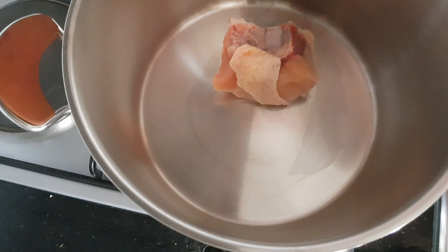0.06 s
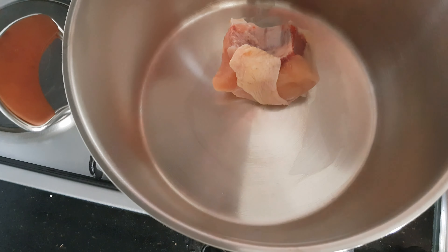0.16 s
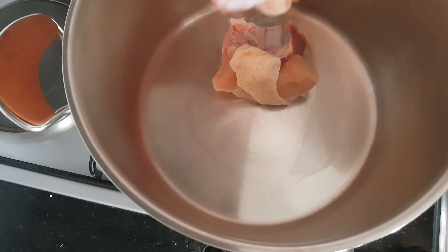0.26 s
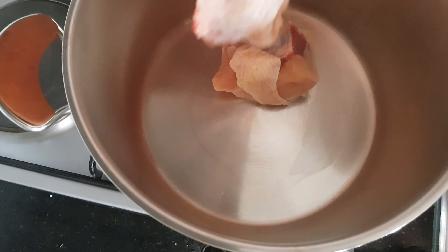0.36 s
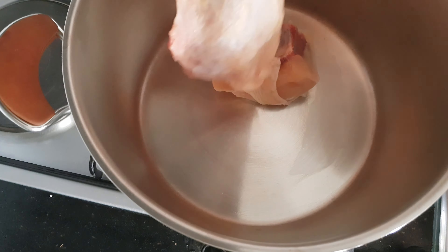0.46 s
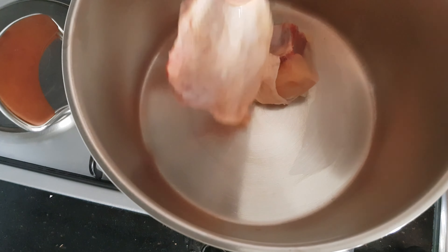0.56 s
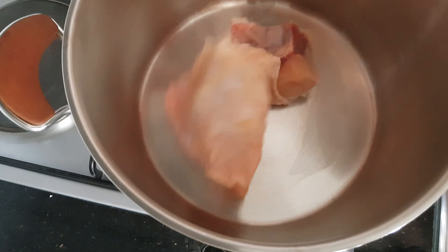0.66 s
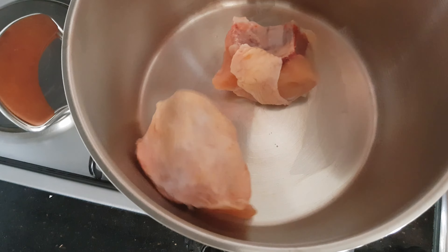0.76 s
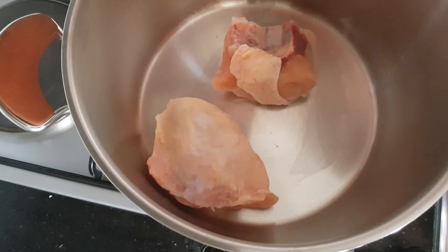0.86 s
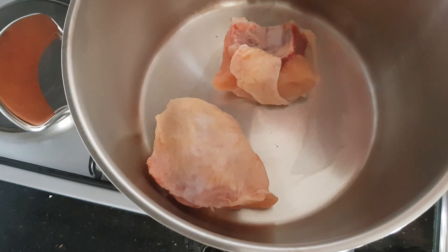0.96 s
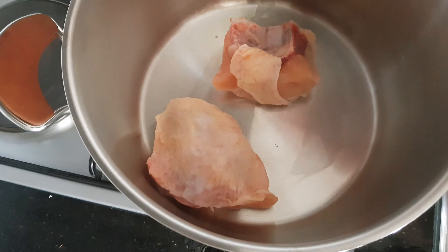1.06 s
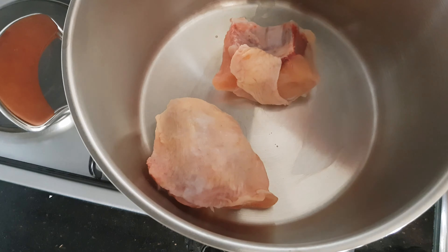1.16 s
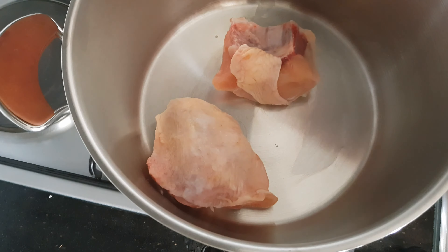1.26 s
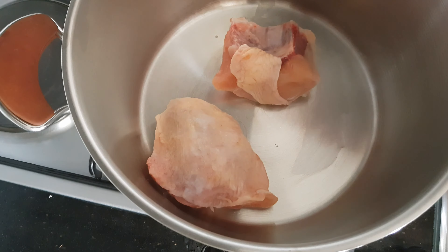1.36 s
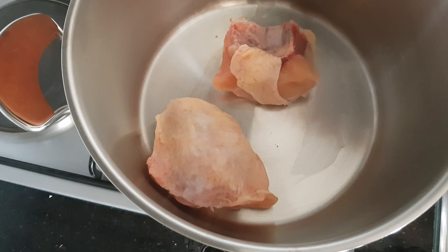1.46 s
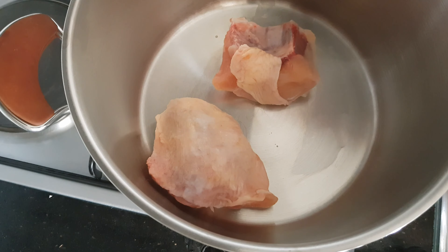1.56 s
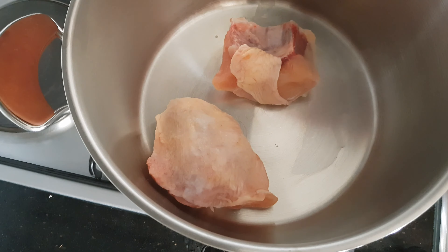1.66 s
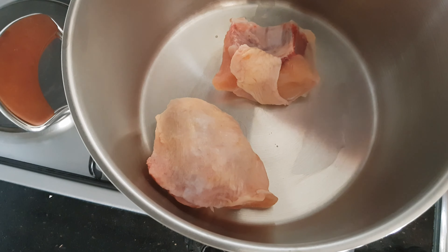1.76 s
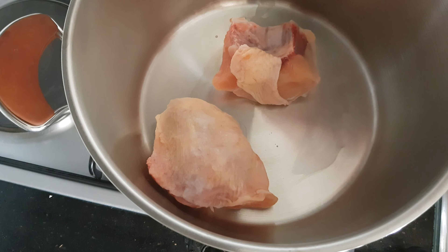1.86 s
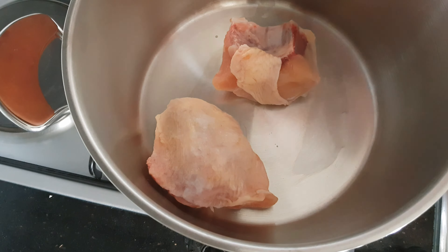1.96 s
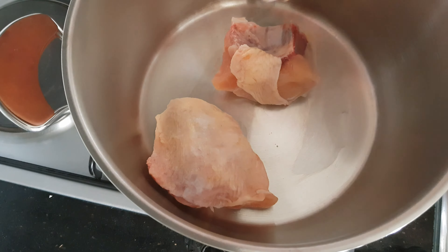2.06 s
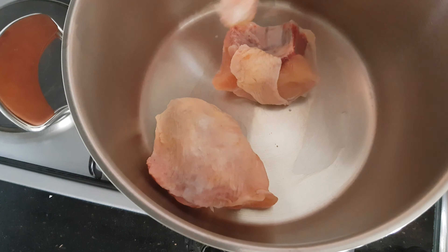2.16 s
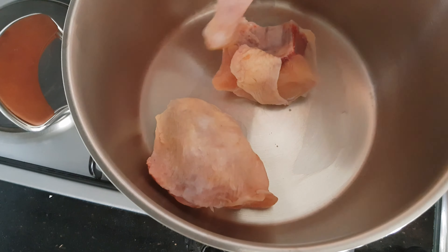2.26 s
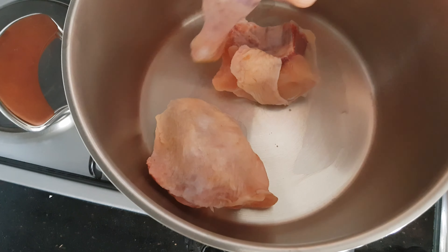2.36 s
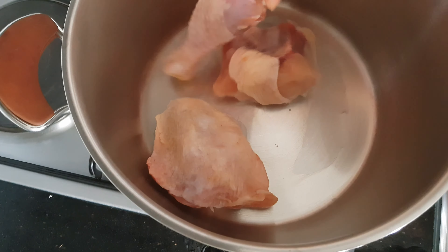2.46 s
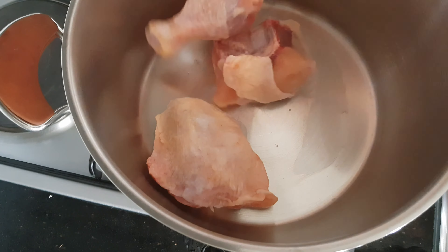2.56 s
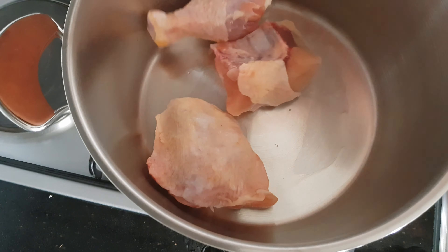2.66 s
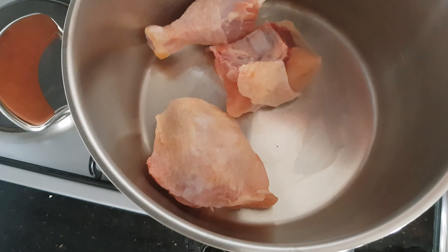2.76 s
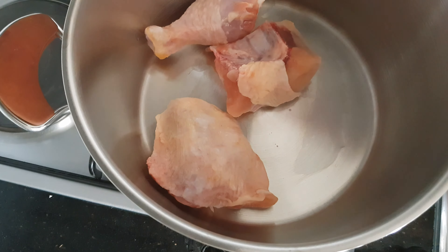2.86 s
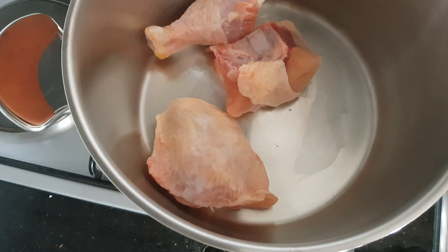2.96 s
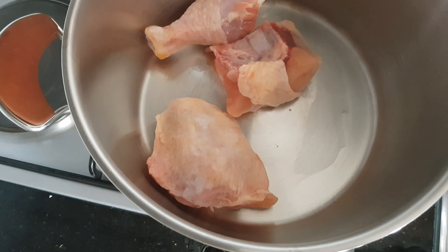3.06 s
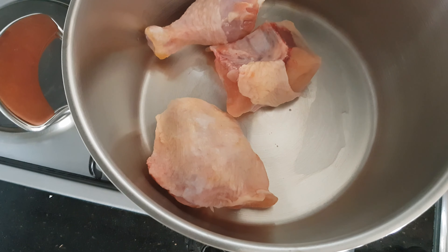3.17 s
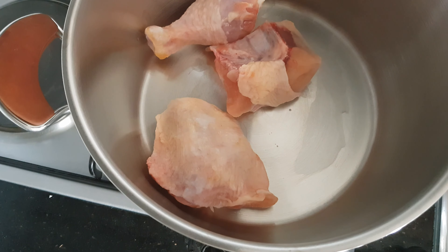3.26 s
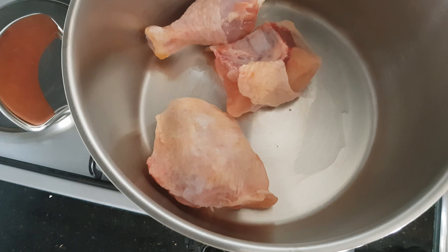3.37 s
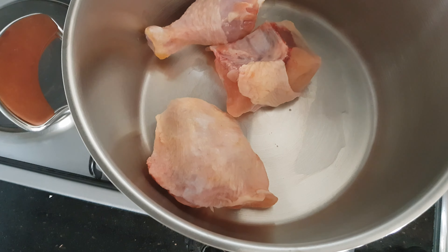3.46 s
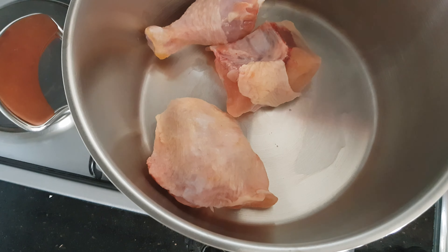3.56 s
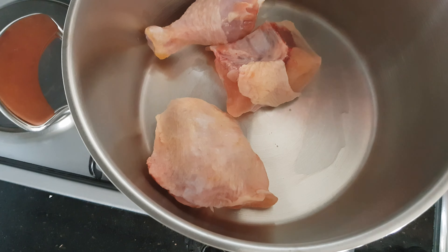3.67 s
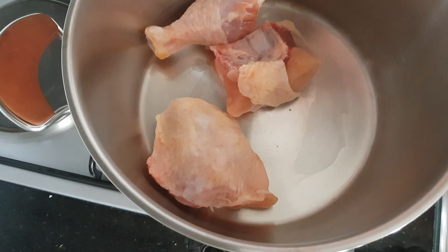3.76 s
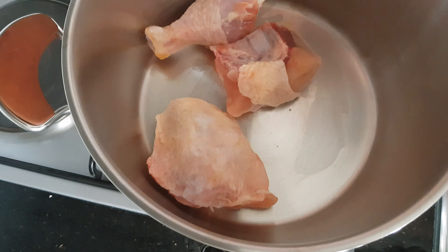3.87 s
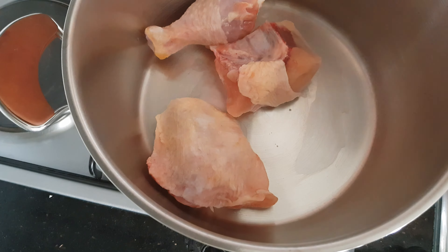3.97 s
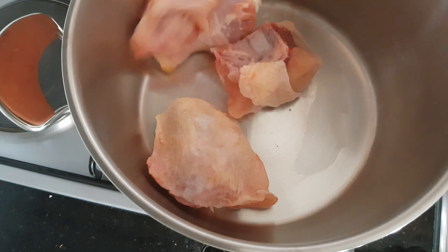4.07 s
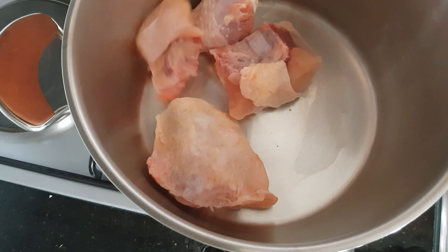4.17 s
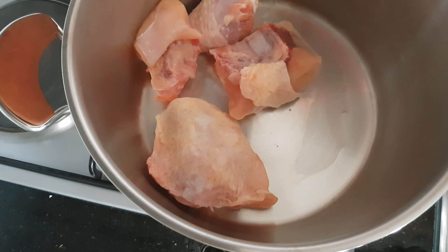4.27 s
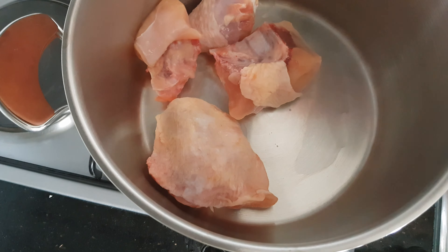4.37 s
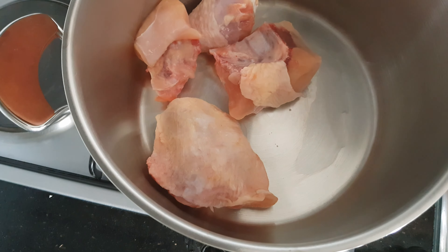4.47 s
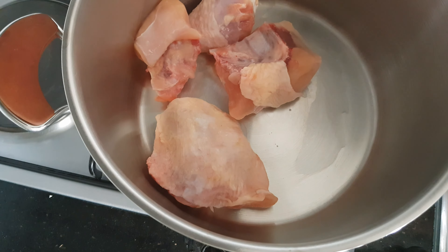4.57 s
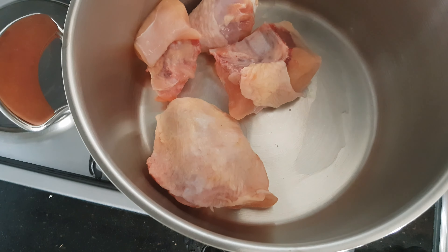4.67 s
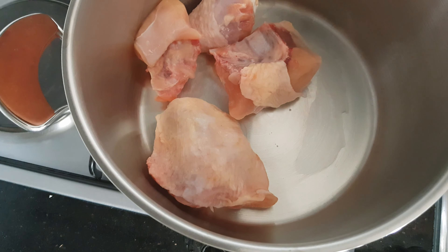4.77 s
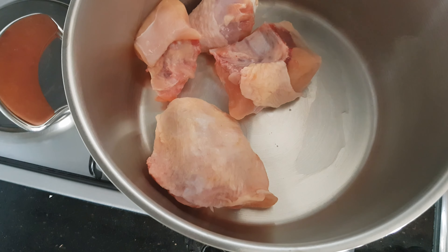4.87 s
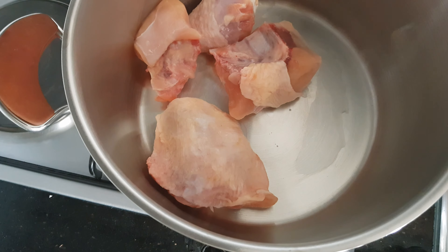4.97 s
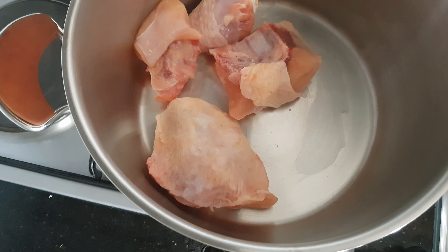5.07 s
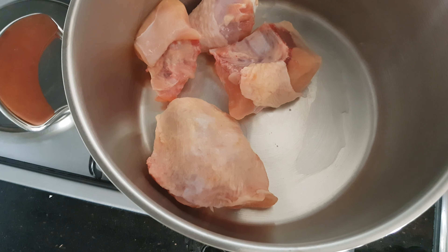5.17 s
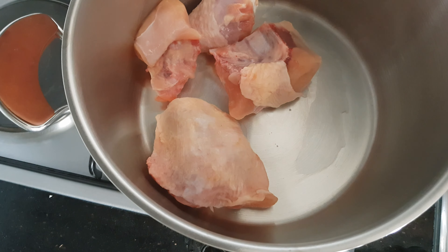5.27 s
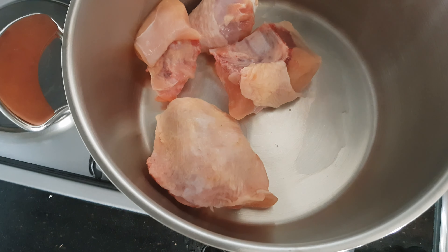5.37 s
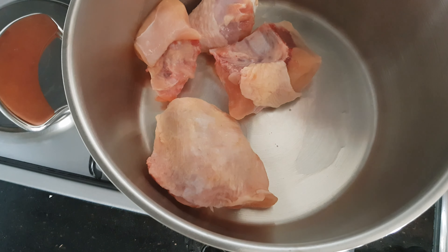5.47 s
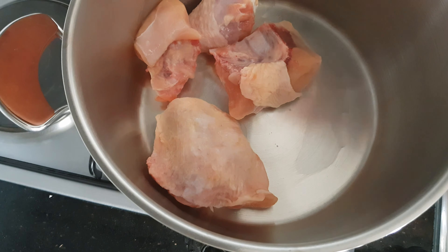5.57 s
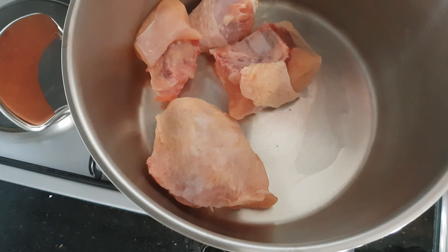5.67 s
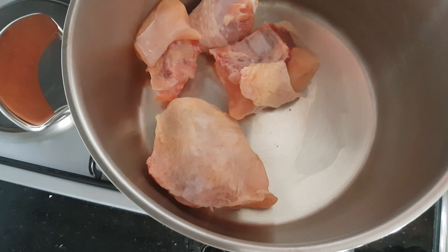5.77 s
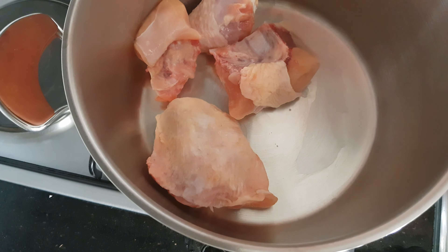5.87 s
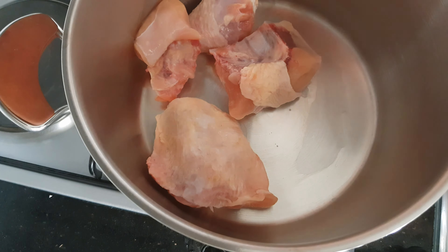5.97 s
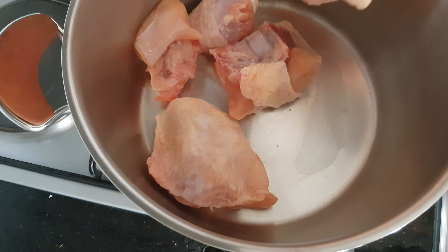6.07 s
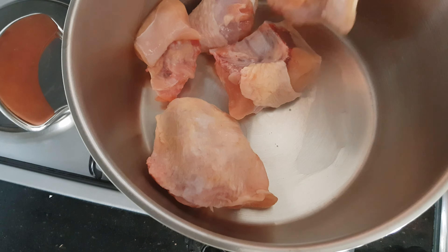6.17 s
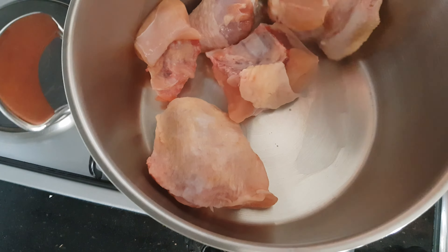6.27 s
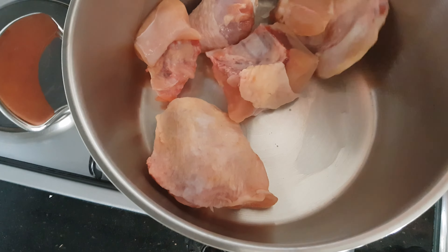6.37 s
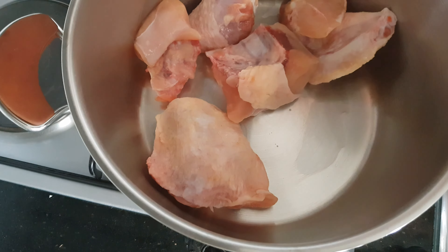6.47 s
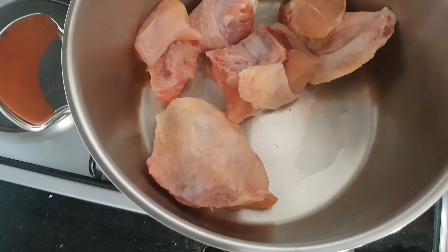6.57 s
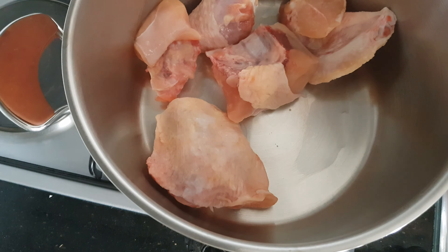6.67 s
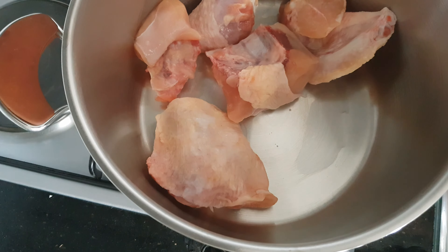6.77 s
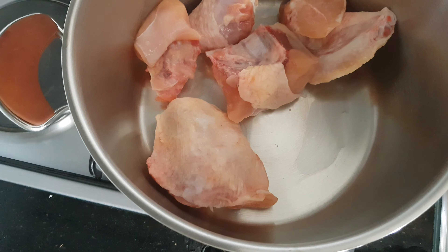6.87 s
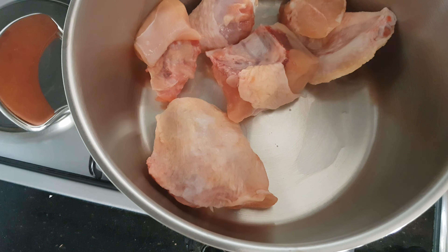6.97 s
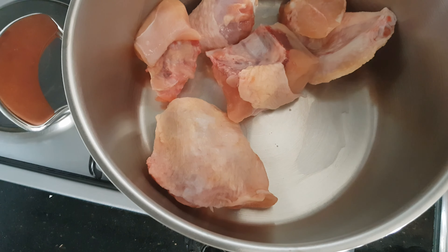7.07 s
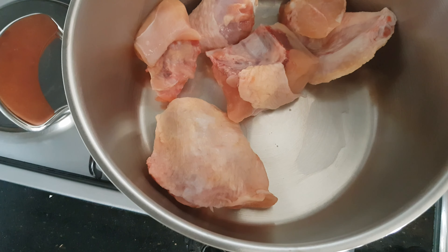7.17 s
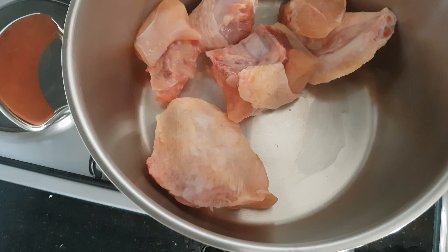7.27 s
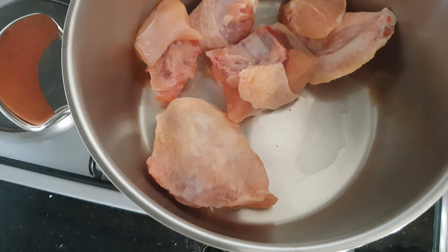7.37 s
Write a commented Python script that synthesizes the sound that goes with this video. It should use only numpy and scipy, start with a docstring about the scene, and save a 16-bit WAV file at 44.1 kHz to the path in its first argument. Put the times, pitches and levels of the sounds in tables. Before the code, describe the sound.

Raw chicken pieces land in a steel pot one at a time, each moist thud followed by the pot briefly clattering on the stove.

```python
"""Soft thuds and wet squelches: four pieces of raw chicken drop one by one into an empty steel pot.
The flesh wobbles and shakes the stove top; film and air are squeezed from between skin and steel.
After each drop the pot rocks and knocks on the grate, its modes ringing briefly.
Between drops wet skin crackles and ticks faintly over the low hum of a small kitchen."""
import sys
import numpy as np
from scipy import signal
from scipy.fft import rfft, irfft, next_fast_len
from scipy.io import wavfile

SR = 44100
rng = np.random.default_rng(int(sys.argv[2]) if len(sys.argv) > 2 else 0)


def wav_record(signal):
    """Record a signal, one row per channel, as 16-bit PCM in the file named by sys.argv[1]."""
    frames = np.transpose(np.atleast_2d(signal))
    bounded = np.clip(frames, -1, 1)
    # unit amplitude maps onto the largest positive 16-bit level
    quanta = np.round(bounded * 32767).astype(np.int16)
    wavfile.write(sys.argv[1], SR, quanta)


N = 327655
TIME = np.arange(N) / SR

# Meat touches down, some pieces again as they topple. Each row: start in s, push in dB, push pitch in Hz,
# slap in dB, time to flatten in s, squelch in dB, gurgle in dB, decay of both in s, flop in dB.
TOUCHDOWNS = [(0.614, -46.5, 85, -59.5, .025, -77, -61, 0.019, -48.5),
              (0.667, -35.5, 213, -59.5, .034, -49, -42.5, 0.024, -43.5),
              (0.764, -50, 88.5, -47, .02, -53.5, -58, 0.02, -46.5),
              (0.780, -39.5, 200, -36, .024, -44.5, -44.5, .02, -45),
              (2.445, -32, 262, -49, .028, -60, -55.5, 0.075, -50),
              (2.568, -50, 273, -52, .04, -57, -53, 0.06, -45),
              (4.037, -54, 107, -58, .05, -44.5, -50.5, 0.035, -52),
              (6.247, -36.5, 214, -50, 0.032, -45, -40.5, 0.015, -37.5)]


def thuds(flop_hz=100):
    """Each landing: a first push, then a flop as the piece flattens and its full weight arrives."""
    out = np.zeros((2, N))
    for s, push_db, push_hz, _, flatten_s, _, _, _, flop_db in TOUCHDOWNS:
        push = thud(push_hz, shake_db=-5, flesh_db=-6, wobble_s=.013)
        flop = thud(flop_hz, shake_db=1, flesh_db=-4.5, wobble_s=.042)
        add(out, s, gain_of(push_db) * push)
        add(out, s + flatten_s, gain_of(flop_db) * flop)
    return panned(2.5) * out


def thud(push_hz, shake_db, flesh_db, wobble_s, rise_s=.007):
    """A push of about one cycle shakes the stove top; wobbling flesh drums on the pot's base."""
    # Each row: frequency in Hz, level in dB, t60 in s.
    stove_modes = [(62, 10, 0.068), (87.6, -14, 1), (123.7, -9.5, 0.63), (161, -5.5, 0.44), (280, -39, 0.7),
                   (340, -47, 0.48), (513, 7, 0.12)]
    t = np.arange(SR // 2) / SR
    stove = sum(gain_of(db - 60 * t / t60) * np.sin(2 * np.pi * hz * t) for hz, db, t60 in stove_modes)
    cycles = t * push_hz
    push = -np.sin(2 * np.pi * cycles) * (np.e * cycles / .8) ** 2 * np.exp(-2 * cycles / .8)
    shake = 2 * signal.fftconvolve(push, stove)[:len(t)] / abs(push).sum()
    flesh = noise(len(t), band(hz=292, octaves=.86)) * np.exp(-t / wobble_s) * (1 - np.exp(-t / rise_s))
    return push + gain_of(shake_db) * shake + gain_of(flesh_db) * flesh


def squelches(slap_decay_s=.0088):
    """Skin slaps steel, trapped air gurgles, and the squelch sinks in pitch as the film is squeezed out."""
    # Each row: centre in Hz, width in octaves, level in dB, peak time as a share of the time to flatten.
    film_bands = [(13300, .35, -7, .45), (5480, 0.4, -0.5, .9)]
    out, t = np.zeros((2, N)), np.arange(SR // 3) / SR
    for s, _, _, slap_db, flatten_s, squelch_db, gurgle_db, decay_s, _ in TOUCHDOWNS:
        slap = np.exp(-t / slap_decay_s) * crackle(len(t), hz=10000, octaves=2)
        gurgle = swell(t, .7 * flatten_s, decay_s) * crackle(len(t), hz=1000, octaves=.8)
        add(out, s, gain_of(slap_db) * slap + gain_of(gurgle_db) * gurgle)
        for hz, octaves, db, share in film_bands:
            film = swell(t, share * flatten_s, decay_s) * crackle(len(t), hz, octaves)
            add(out, s, gain_of(squelch_db + db) * film)
    return out


def knocks(scatter_db=2.4, right_lag_s=.00008, scatter_rad=.7, burst_s=.0084, wash_s=.013):
    """The pot rocks on the grate; each knock rings its modes and rattles round inside it."""
    # Each row: start in s, level in dB, contact cut-off in Hz, wall-mode gain in dB.
    hits = [(0.656, -36.5, 3030, -4), (0.7452, -42.5, 2880, -3), (0.773, -27.5, 4300, -7),
            (0.8098, -33, 3760, 10.5), (0.8421, -39, 3420, -8), (2.463, -35.5, 1920, -5),
            (2.6001, -23.5, 3400, -7), (2.6730, -22, 4030, 0), (2.713, -33.5, 2200, -7),
            (4.0744, -30, 2900, -7), (4.109, -27, 2880, -7.5), (4.1701, -33.5, 2150, 0),
            (4.2070, -41, 2200, -1), (6.2732, -31, 2400, -5), (6.3141, -24.5, 7800, 13),
            (6.4134, -28, 4600, 6.5), (6.4904, -30.5, 4450, 6), (6.538, -48, 2010, 12),
            (6.5843, -43, 1900, 1.5)]
    # Modes of the meat-damped pot. Each row: frequency in Hz, level in dB, t60 in s, wall share 0-1.
    pot_modes = [(482, -25, 0.13, 0), (869, -25.5, 0.13, 0.5), (968, -17.5, 0.085, 0.2),
                 (1144, -13, 0.032, 0.1), (1246.6, -14, 0.069, 0.4), (1466, -9.5, 0.016, 0.4),
                 (1543, -18, 0.057, 0.95), (1744, -10, 0.036, 0.5), (1892, 0.5, 0.013, 0.4),
                 (1970, -5, 0.0493, 0), (2225, -22.5, 0.2, 0.3), (2300, -2, 0.0084, 0.8),
                 (2550, -15.5, 0.054, 0.4), (2650, -14, 0.015, 0.89), (2905, -18, 0.035, 0.82),
                 (3260, -10.5, 0.028, 0.09), (3527, -13.5, .015, 0.4), (3660, -50.5, .9, .3),
                 (3800, -55, .8, 0.1), (4220, -21.5, 0.039, 0.16), (4620, -17, 0.063, 0.27),
                 (5000, -22.5, 0.065, .2), (5290, -24.5, 0.08, 0.55), (5800, -37, 0.044, 0.33),
                 (6430, -24.5, 0.065, 0.24), (6800, -26.5, 0.065, 0)]
    # Crowd of small modes and echoes in the pot. Each row: frequency in Hz, relative density in dB.
    clatter_spectrum = [(200, -32), (480, -13), (700, -22.5), (1000, -14.5), (1550, -24), (2050, 5.5),
                        (2700, -24), (3400, -3), (4100, -15.5), (5100, -7.5), (6500, -9.5), (9000, -9.5),
                        (12500, -3.5), (15500, -22)]
    # Each new piece shifts the load and the modes it favours.
    # Each row: start in s, low-mode gain in dB, upper base-mode gain in dB, left over right in dB.
    loads = [(0, 6, 9.5, 2), (2, -0.5, -1.5, 3), (4, 2.5, 6, 4.5), (6, 3, 3, 1)]
    out, t = np.zeros((2, N)), np.arange(SR // 3) / SR
    hz, db, t60, wall = np.transpose(pot_modes)
    # Neighbouring modes swing in opposite senses and arrive later on the right.
    phase = np.pi * np.arange(len(hz)) - 2 * np.pi * hz * np.array([[0], [right_lag_s]])
    decay = gain_of(-60 * t / t60[:, None])
    low, upper = 1 / (1 + (hz / 1500) ** 6), band(hz=3380, octaves=.12)(hz)
    clatter_envelope = gain_of(-6) * np.exp(-(t / burst_s) ** 2) + gain_of(-17) * np.exp(-t / wash_s)
    for s, level_db, contact_hz, wall_db in hits:
        _, low_db, upper_db, pan_db = [load for load in loads if load[0] <= s][-1]
        # The meat shifts between knocks: pitches and levels scatter.
        pitch_hz = hz * (1 + .005 * rng.standard_normal(len(hz)))
        mode_db = db + low_db * low + upper_db * upper + wall_db * wall
        mode_db += scatter_db * rng.standard_normal(len(hz))
        jitter = scatter_rad * rng.standard_normal((2, len(hz))) * [[.4], [1]]
        weights = gain_of(mode_db) * np.exp(1j * (phase + jitter))
        ring = (weights @ (decay * np.exp(2j * np.pi * pitch_hz[:, None] * t))).imag
        clatter = clatter_envelope * noise((2, len(t)), lambda f: gain_of(lookup(clatter_spectrum, f)))
        blow = (ring + clatter) * (1 - np.exp(-t * contact_hz / 2))  # softer contact, slower rise
        add(out, s, gain_of(level_db) * panned(pan_db) * contact(blow, contact_hz))
    return out


def contact(x, hz, q=1.1):
    """Springy contact: a resonant low-pass at hz, with a further roll-off above it."""
    x = signal.lfilter(*signal.butter(1, min(3.4 * hz, SR * .45), fs=SR), x)
    w = np.tan(np.pi * min(hz, SR * .45) / SR)
    denominator = [1 + w / q + w * w, 2 * (w * w - 1), 1 - w / q + w * w]
    return signal.lfilter(w * w * np.array([1, 2, 1]), denominator, x)


def ticks(snap_s=.0006, echo_s=.013):
    """Sticky skin snaps free: short ticks, pitched over a broad body, that echo in the pot."""
    # Each row: start in s, level in dB, pitch in Hz.
    snaps = [(0.719, -37, 12800), (1.7033, -60, 7230), (3.1442, -52, 14100), (3.187, -57, 7060),
             (3.236, -40.5, 13500), (4.623, -51.5, 14000), (4.8292, -57, 11700)]
    out, t = np.zeros((2, N)), np.arange(4096) / SR
    body = band(hz=5400, octaves=1.7)
    envelope = np.exp(-t / snap_s) + gain_of(-21) * np.exp(-t / echo_s)
    for s, db, hz in snaps:
        snap = noise((2, len(t)), lambda f: band(hz, octaves=.067)(f) + gain_of(-17) * body(f))
        add(out, s, gain_of(db) * snap * envelope)
    return out


def handling(pops_db=-10, rest_db=-88):
    """Wet skin crackles and tiny bubbles pop as the next piece is picked up."""
    # Each row: start in s, rise in s, decay in s, level in dB.
    pickups = [(.5, 0.051, 0.055, -76), (1.15, 0.2, 0.24, -77), (2.2, 0.056, .08, -79.5),
               (3, 0.035, .2, -76.5), (4.6, 0.21, 0.31, -78), (7.165, 0.0058, 0.031, -68)]
    grains = crackle(N, hz=6800, octaves=3.3, per_s=1500, spread_db=1)
    pops = crackle(N, hz=13200, octaves=.35, per_s=84, spread_db=2.5)
    return (grains + gain_of(pops_db) * pops) * (swells(pickups) + gain_of(rest_db))


def swishes():
    """Soft, dull brushing between the drops."""
    # Each row: start in s, rise in s, decay in s, level in dB.
    strokes = [(1.722, 0.032, .11, -63), (2.222, 0.066, 0.12, -65.5), (5.17, 0.16, .25, -69.5)]
    return swells(strokes) * noise((2, N), band(hz=890, octaves=.73))


def echoes(x, fade_s=.03):
    """Early reflections from the hood and the tiles behind the stove."""
    # Each row: four path delays in s; left row, then right.
    paths = [
        [.0085, .0115, .0165, .0225],
        [.0078, .0125, .018, .0245],
    ]
    out = np.zeros((2, N))
    for channel, delays_s in enumerate(paths):
        for s in delays_s:
            add(out[channel:channel + 1], s, np.exp(-s / fade_s) * x[channel])
    return out


def reverb(x, onset_s=.0062, mono_hz=260):
    """The kitchen's diffuse tail: mono in the bass, each band dying at its own rate."""
    # Each row: frequency in Hz, t60 in s.
    decay_times = [(150, 0.95), (700, 0.49), (2000, 0.42), (3200, 0.36), (3800, 0.54), (5200, 0.29),
                   (7000, 0.5), (14000, 0.25)]
    diffuse = stereo_noise(SR * 3 // 4, lambda f: 1 / (1 + (f / mono_hz) ** 4))
    hz, t, bands = signal.stft(diffuse, SR, nperseg=256)
    envelope = gain_of(-60 * t / lookup(decay_times, hz)[:, None]) * (1 - np.exp(-(t / onset_s) ** 2))
    tail = signal.istft(bands * envelope, SR, nperseg=256)[1]
    return signal.fftconvolve(x, tail / np.linalg.norm(tail[0]), axes=1)[:, :N]


def background(rumble_peak_s=4.72, rumble_width_s=.36):
    """Steady kitchen air, a wavering hum and a deep rumble that swells once."""
    # Each row: frequency in Hz, relative density in dB.
    air_spectrum = [(25, -30.5), (42, -4), (100, -5), (165, -7.5), (215, -18), (290, -9.5), (450, -18),
                    (750, -20), (1100, -20.5), (1600, -29.5), (2500, -43.5), (3300, -45.5), (6000, -44.5),
                    (8600, -56.5), (12500, -43.5), (16000, -47.5)]
    # Each row: frequency in Hz, left-right correlation.
    air_correlation = [(60, 1), (150, 0.82), (380, 0.73), (950, -0.15), (2400, -0.064), (6000, -0.17),
                       (15000, -0.23)]
    # Each row: frequency in Hz, level in dB.
    hum_tones = [(276, -68), (621, -76)]
    # Each row: frequency in Hz, left over right in dB.
    balance = [(60, 2.5), (380, -0.5), (2380, -2), (15000, 0)]
    air = stereo_noise(N, lambda f: lookup(air_correlation, f))
    air = gain_of(-58) * unit_rms(filtered(air, lambda f: gain_of(lookup(air_spectrum, f))))
    hum = sum(gain_of(db) * noise(N, band(hz, octaves=.044)) for hz, db in hum_tones)
    surge = np.exp(-.5 * ((TIME - rumble_peak_s) / rumble_width_s) ** 2)
    rumble = noise(N, band(hz=45.7, octaves=.1)) * (gain_of(-66) + gain_of(-55.5) * surge)
    return filtered(air + hum + rumble, lambda f: gain_of(np.outer([.5, -.5], lookup(balance, f))))


def crackle(size, hz, octaves, per_s=4000, spread_db=3.5):
    """Tiny wet snaps of uneven size in one band; stereo, rms 1."""
    sizes = gain_of(spread_db * np.minimum(rng.exponential(1, (2, size)), 4))
    snaps = sizes * rng.standard_normal((2, size)) * (rng.random((2, size)) < per_s / SR)
    return unit_rms(filtered(snaps, band(hz, octaves)))


def noise(shape, gain):
    """Noise shaped by gain(Hz); rms 1."""
    return unit_rms(filtered(rng.standard_normal(shape), gain))


def stereo_noise(size, correlation):
    """White noise whose channels are alike by correlation(Hz)."""
    left, other = rng.standard_normal((2, size))
    right = filtered(left, correlation) + filtered(other, lambda f: np.sqrt(1 - correlation(f) ** 2))
    return np.array([left, right])


def swell(t, rise_s, decay_s):
    """A gathering rise, then exponential decay."""
    return np.clip(t / rise_s, 0, 1) ** 1.5 * np.exp(-np.maximum(t - rise_s, 0) / decay_s)


def swells(rows):
    """Sum of timed swells as one envelope."""
    return sum(gain_of(db) * swell(TIME - s, rise_s, decay_s) for s, rise_s, decay_s, db in rows)


def filtered(x, gain):
    """Zero-phase filter by gain(Hz)."""
    size = next_fast_len(x.shape[-1], True)
    return irfft(rfft(x, size) * gain(np.fft.rfftfreq(size, 1 / SR)), size)[..., :x.shape[-1]]


def band(hz, octaves):
    """Bell-shaped gain over log frequency."""
    return lambda f: np.exp(-.5 * (np.log2((f + 1) / hz) / octaves) ** 2)


def lookup(points, hz):
    """Interpolates a table over log frequency."""
    f, value = np.transpose(points)
    return np.interp(np.log(hz + 1), np.log(f + 1), value)


def gain_of(db):
    """Decibels to amplitude."""
    return 10 ** (np.asarray(db) / 20)


def unit_rms(x):
    """Scales to rms 1."""
    return x / np.sqrt(np.mean(x ** 2) + 1e-20)


def panned(db):
    """Channel gains for left over right in dB."""
    return gain_of(np.array([[db], [-db]]) / 2)


def add(mix, s, sound):
    """Mixes a sound in at s seconds."""
    part = mix[:, round(s * SR):][:, :sound.shape[-1]]
    part += sound[..., :part.shape[1]]


def scene():
    """Pot and meat close by, the kitchen around them."""
    pot, meat = knocks(), thuds()
    wet = squelches() + ticks() + handling() + swishes()
    # The open pot beams its treble up at the hood.
    beam = filtered(gain_of(-12) * pot + gain_of(-16.5) * wet, band(hz=7100, octaves=2.5))
    shimmer = filtered(pot, band(hz=2800, octaves=.091))  # the wall's ring lingers here
    send = gain_of(-13) * pot + gain_of(-20.5) * shimmer + gain_of(-8.5) * meat + gain_of(-14.5) * wet
    return pot + meat + wet + echoes(beam) + reverb(send) + background()


def record(dry):
    """Bass cut at 35 Hz, band limit at 16.2 kHz."""
    cut = filtered(dry, lambda f: 1 - 1 / (1 + (f / 35) ** 12))
    low_pass = signal.firwin(511, 16200, window=("kaiser", 9), fs=SR)
    return signal.oaconvolve(cut, low_pass[None], "same")


dry = scene()
out = record(dry)
wav_record(out)
```